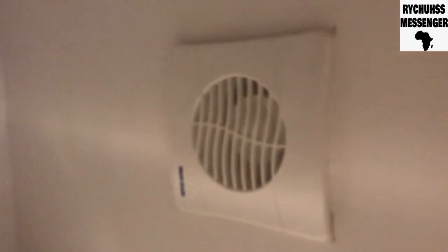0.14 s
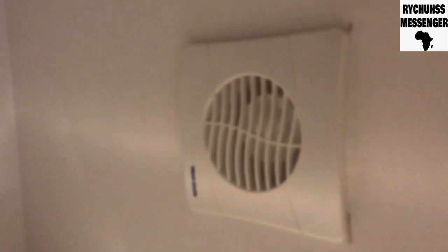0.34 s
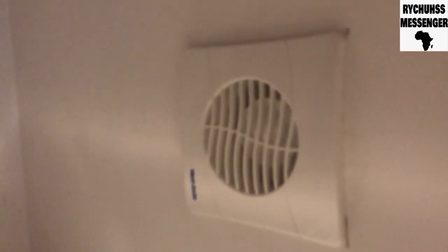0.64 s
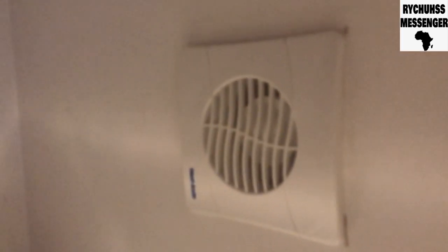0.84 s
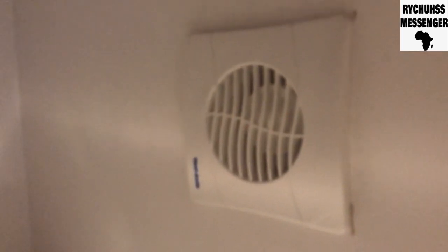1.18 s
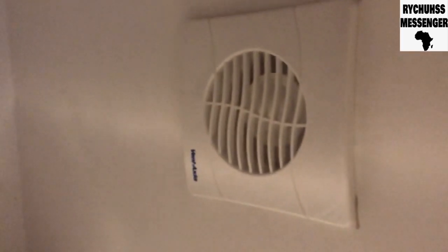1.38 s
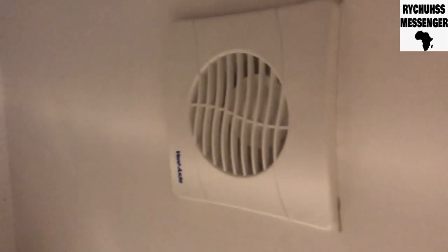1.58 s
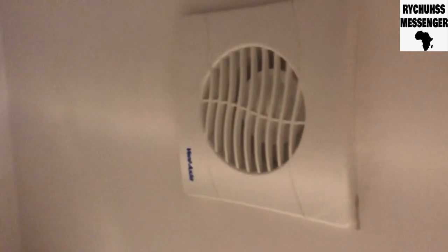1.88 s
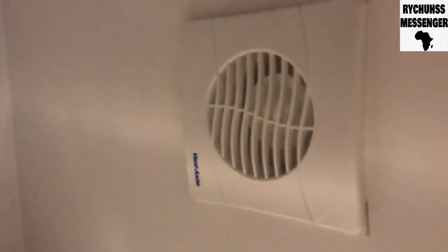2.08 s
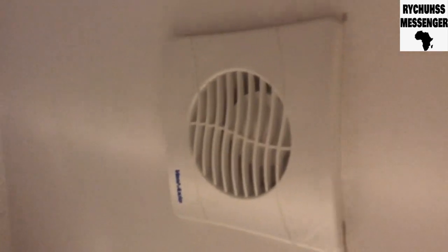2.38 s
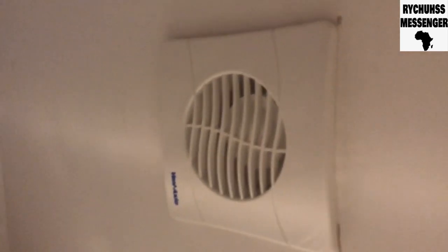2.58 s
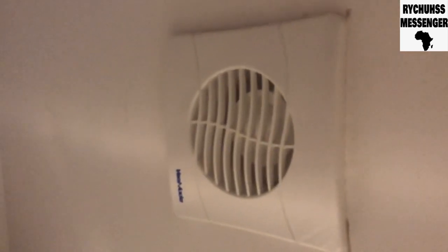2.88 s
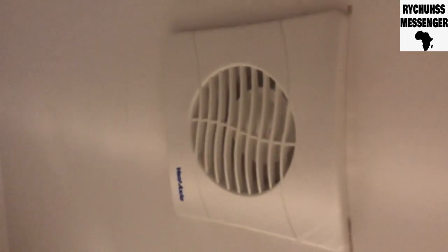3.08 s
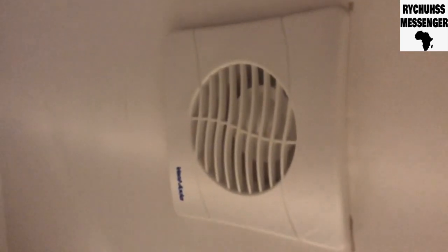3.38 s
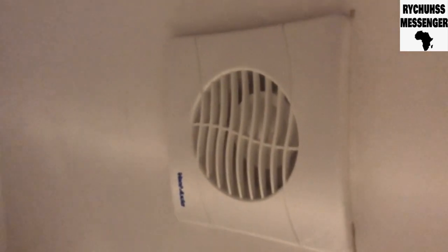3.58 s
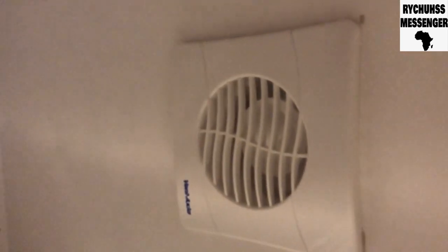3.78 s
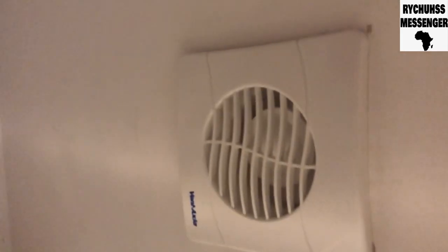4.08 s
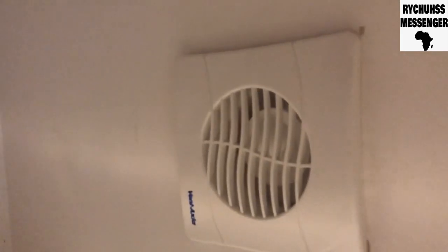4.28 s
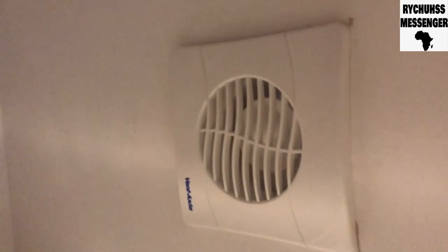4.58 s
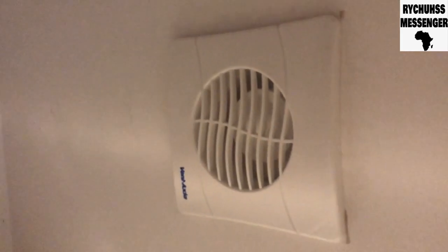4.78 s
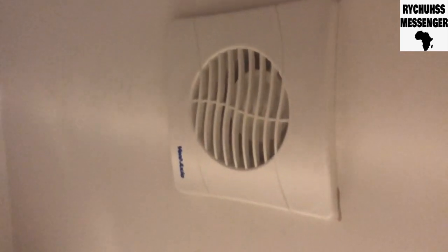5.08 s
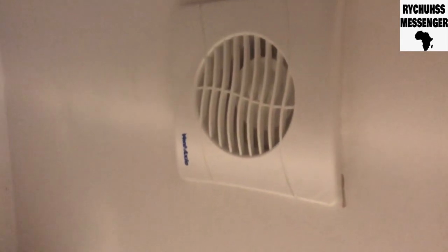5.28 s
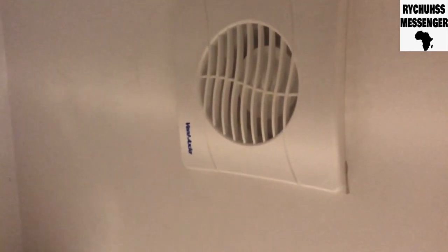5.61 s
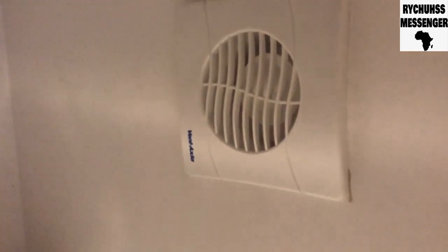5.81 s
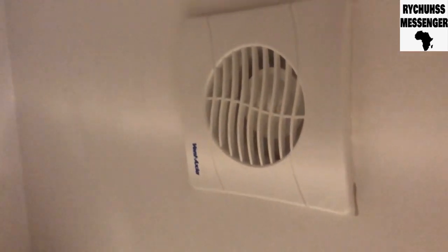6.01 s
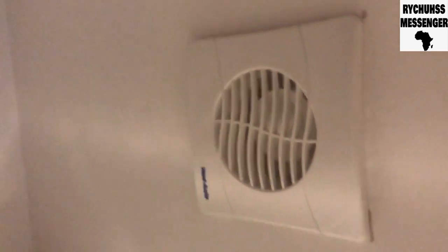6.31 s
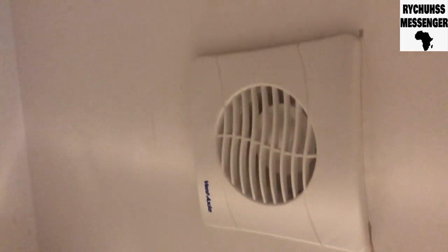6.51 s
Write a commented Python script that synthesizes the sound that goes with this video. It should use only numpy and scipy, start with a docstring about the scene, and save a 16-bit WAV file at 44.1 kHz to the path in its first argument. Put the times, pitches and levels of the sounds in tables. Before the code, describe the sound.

A bathroom extractor fan runs close by with a steady low motor hum and a soft, hollow rush of air.

```python
"""A steady hum and rush of air: a bathroom extractor fan, close by in a small hard room.
The motor hums at twice the mains frequency, the blades add a thin tone, and air rushes through
duct and grille, with brief faint hoots. Faint ticks come through, and soft handling noise from a
hand-held camera. Late on, with one short thud, the sound turns a little fuller."""
import sys
import numpy as np
from scipy import signal
from scipy.fft import rfft, irfft, next_fast_len
from scipy.io import wavfile
from scipy.ndimage import uniform_filter1d, map_coordinates

SR = 44100
rng = np.random.default_rng(int(sys.argv[2]) if len(sys.argv) > 2 else 0)


def master(y):
    """Save y as 16-bit WAV."""
    cut = np.clip(np.atleast_2d(y).T, -1, 1)
    pcm = np.round(cut * 32767)  # scale
    wavfile.write(sys.argv[1], SR, pcm.astype(np.int16))


N = 293265

# motor side tones: f/Hz, level/dB
SIDE_TONES = [(144, -54.5), (244.2, -67.5), (256.3, -59.5), (300.2, -63.5)]
# air rush spectrum: f/Hz, relative level/dB
AIR_SPECTRUM = [(22.0, -25), (40.0, -21.5), (62.0, -9.5), (150.0, -0.5), (320.0, -14), (560.0, -1),
                (800.0, -9.5), (1400.0, -11.5), (2200.0, -10.5), (4800.0, -23), (6200.0, -29.5),
                (9500.0, -35), (15500.0, -36.5)]
# standing waves of duct and room: f/Hz, width/Hz, gain/dB
DUCT_MODES = [(124, 57, -2), (143, 14, 3.5), (181.5, 29, 6.5), (225, 8, -3.5), (267.4, 36, 7), (296, 12, 2),
              (324.5, 3.8, 12.5), (370, 15, 6), (425.5, 50, 7), (482, 13, -3.5), (568, 6.5, 4.5),
              (707, 42, -5.5), (731, 7, 5.5), (737, 22, -3), (782, 7, 6), (872, 24, 3), (949, 34, 5.5),
              (1065, 58, -2.5), (1190, 56, -7.5), (1220, 41, 1), (1568, 57, -8), (1710, 60, 1),
              (1920, 22, 1), (2010, 290, -5.5), (2114, 39, 2.5), (2330, 480, -6), (2710, 140, -5),
              (2795, 28, 2.5), (3054, 180, -3.5), (3330, 430, -4.5), (3415, 34, 3), (4170, 150, -4.5)]
# added colour of the fuller rush: f/Hz, gain/dB
FULLER_EQ = [(150, -1), (300, 0), (550, -1), (800, 0.5), (1100, 3.3), (1400, 2), (2200, 0.4), (5000, 0.4),
             (10000, 0), (14000, 2)]
# band gains as the camera drifts: t/s, hollow/dB, whine/dB
DRIFT_GAINS = [(0, -1, -2.5), (1.8, 0, 0), (2.3, 0.3, -1.5), (3.1, -0.8, 1.3), (4, -.5, 0.3), (5, -1.8, 0),
               (5.9, -4, -2.5), (6.65, -2, -1)]
# notes in the rush: t/s, half length/s, f/Hz, width/Hz, level/dB
HOOTS = [(0.885, .045, 1410, 30, -52), (0.88, .05, 1920, 34, -53), (2.61, .07, 1680, 45, -50),
         (6.285, .1, 808, 26, -43), (6.27, .06, 915, 40, -49)]
# low thuds: t/s, peak/dB, f/Hz, half length/s
THUDS = [(1.799, -29, 88, .012), (1.86, -28.5, 85, .014), (2.274, -25.5, 101, 0.0064),
         (2.453, -33, 85, .011), (3.403, -23.5, 104, 0.011), (3.437, -32, 68, .022), (5.213, -31, 75, .012)]
# distinct ticks: t/s, level/dB, f/Hz, width/oct
TICKS = [(0.006, -56.5, 5450, 0.054), (0.092, -56.5, 5100, 0.14), (0.335, -60.5, 7000, .25),
         (0.443, -62, 5300, .065), (0.544, -60.5, 5470, .04), (0.637, -63.5, 5400, .035),
         (0.858, -55.5, 5300, .06), (0.858, -55.5, 1750, 0.33), (0.943, -62, 5000, .045),
         (1.012, -60, 5060, 0.093), (1.05, -63, 6850, .1), (1.324, -60, 4680, .08),
         (1.352, -58, 12200, 0.3), (1.53, -66, 13700, .1), (1.83, -58.5, 14000, 0.43),
         (1.98, -63, 14900, .06), (2.245, -62, 6900, .07), (2.279, -61, 4900, .08),
         (2.365, -57.5, 3380, .05), (2.53, -64, 12500, .16), (2.586, -59.5, 9400, 0.38),
         (2.738, -61.5, 5100, 0.11), (2.819, -62.5, 8330, 0.046), (2.855, -64, 15000, .09),
         (3.135, -67, 14000, .12), (3.339, -67, 6290, .05), (3.709, -60.7, 12100, .22),
         (3.976, -62.5, 12000, .18), (4.014, -62, 5050, .07), (4.123, -58, 4260, .09),
         (4.24, -66, 5080, .06), (4.43, -62, 5550, .07), (4.6, -63, 14000, .08), (4.745, -67, 9500, .1),
         (5.092, -66, 6980, .05), (5.441, -64.5, 8500, .6), (5.521, -59, 5800, .08),
         (5.672, -61.5, 6800, 0.37), (5.779, -60, 3400, .04), (5.871, -60, 8000, .7),
         (5.892, -59, 4350, .06), (6.11, -61, 6750, .12), (6.163, -53, 6800, 0.26), (6.165, -61, 14000, .2),
         (6.213, -58.5, 8000, .24), (6.392, -65, 9300, .08)]
# decay of the hard room: f/Hz, T60/s
ROOM_T60 = [(300, 0.33), (4000, 0.15), (9000, 0.13), (15000, 0.13)]


def motor(hum_hz=100.07, hum_db=-27.5, octave_db=-39.0, hum_rise_db=1.53, octave_rise_db=0.8):
    """Magnetic pull shakes the motor twice per mains cycle; the rotor adds side tones."""
    t = clock()
    phase = 2 * np.pi * hum_hz * t
    hum = amp(hum_db + hum_rise_db * fuller()) * np.cos(phase)
    octave = amp(octave_db + octave_rise_db * fuller() + .3 * wobble(2.94)) * np.cos(2 * phase)
    side = sum(amp(db) * np.sin(2 * np.pi * hz * t + .5 * wobble(0.96)) for hz, db in SIDE_TONES)
    return np.sqrt(2) * (hum - octave + side)  # the octave flattens the crests


def air(level_db=-36.5, flutter_db=0.26):
    """Turbulence at blades and grille, coloured by the standing waves of duct and room."""
    modes_db = lambda hz: sum(db * bell(hz, centre, width) for centre, width, db in DUCT_MODES)
    turbulence = off_walls(eddies(rng.standard_normal(N)))
    rush = unit(filtered(turbulence, lambda hz: amp(along(AIR_SPECTRUM, hz) + modes_db(hz))))
    full_rush = filtered(rush, lambda hz: amp(along(FULLER_EQ, hz)))
    return amp(level_db + flutter_db * wobble(7)) * (rush + fuller() * (full_rush - rush))


def eddies(x, patchy_db=2.0, from_hz=5000):
    """The finest eddies come and go in patches across the treble."""
    hz, _, spectrum = signal.stft(x, SR, nperseg=512)
    patches = uniform_filter1d(rng.standard_normal(spectrum.shape), size=16, axis=0)
    patches = unit(uniform_filter1d(patches, size=9, axis=1))
    depth_db = patchy_db * (1 - np.exp(-(hz / from_hz) ** 2))
    return signal.istft(spectrum * amp(depth_db[:, None] * patches), SR, nperseg=512)[1][:N]


def off_walls(x, count=4, decay_s=0.036, from_hz=750, wet_gain=.36):
    """Wall echoes cut a fine comb into mids and treble; it shifts as the hand sways."""
    t = np.arange(SR // 8) / SR
    wet = np.zeros(N)
    for _ in range(count):
        echoes = rng.standard_normal(len(t)) * np.exp(-t / decay_s) * (t > .003)
        wet += wobble(1.506) * signal.fftconvolve(x, echoes / np.linalg.norm(echoes))[:N]
    running_rms = np.sqrt(np.abs(uniform_filter1d(wet ** 2, SR // 20)) + 1e-9)
    return x + filtered(wet_gain * wet / running_rms, lambda hz: 1 - np.exp(-(hz / from_hz) ** 4))


def drift(x, hollow_hz=547, whine_hz=1650):
    """Two bands wax and wane as the camera moves through the room's standing waves."""
    at_s, hollow_db, whine_db = np.transpose(DRIFT_GAINS)
    for gain_db, centre_hz, width_hz in ((hollow_db, hollow_hz, 170), (whine_db, whine_hz, 160)):
        band = filtered(x, lambda hz: np.exp(-((hz - centre_hz) / width_hz) ** 2))
        x = x + (amp(np.interp(clock(), at_s, gain_db)) - 1) * band
    return x


def fuller(at_s=5.207, ramp_s=.012):
    """Ramp from 0 to 1 where hum and rush turn fuller."""
    return np.clip((clock() - at_s) / ramp_s + .5, 0, 1)


def blades(tone_hz=672, drift_hz=0.66, level_db=-50.3, waver_db=1.5, flutter_rad=.28):
    """Thin blade tone, made unsteady by the turbulent inflow."""
    phase = 2 * np.pi * np.cumsum(tone_hz + drift_hz * wobble(2.03)) / SR
    return amp(level_db + waver_db * wobble(6.3)) * unit(np.sin(phase + flutter_rad * wobble(18)))


def hoots():
    """Faint hollow notes of unsteady pitch swell briefly in the rush."""
    out = np.zeros(N)
    for at_s, half_s, centre_hz, width_hz, db in HOOTS:
        phase = 2 * np.pi * np.cumsum(centre_hz + .5 * width_hz * wobble(40)) / SR
        out += amp(db) * unit(np.sin(phase)) * swell(at_s, half_s)
    return out


def thuds():
    """Low thuds of a cycle or two: handling bumps, and one short thud where the hum turns fuller."""
    return -sum(amp(db) * np.cos(2 * np.pi * hz * (clock() - at_s)) * swell(at_s, half_s)
                for at_s, db, hz, half_s in THUDS)


def scuff(at_s=6.13, half_s=.15, centre_hz=4200, width_oct=.9, level_db=-53, grain_db=4):
    """The hand shifts its grip: a short, grainy rustle."""
    band = lambda hz: np.exp(-(np.log2((hz + 1) / centre_hz) / width_oct) ** 2)
    hiss = unit(filtered(rng.standard_normal(N), band))
    return amp(level_db) * unit(hiss * amp(grain_db * wobble(160))) * swell(at_s, half_s)


def tick(centre_hz, width_oct, attack_s=.0055, snap_t60_s=0.037, ring_t60_s=.07, snap_db=-5, skirt_db=-17):
    """Tiny snap drawn out by the room, rms 1; a narrower band rings more at one pitch."""
    tail = room_tail()
    t = np.arange(len(tail)) / SR
    snap = rng.standard_normal(len(t)) * amp(-60 * t / snap_t60_s)
    burst = tail + amp(snap_db) * snap / np.linalg.norm(snap)
    away_oct = lambda hz: np.log2((hz + 1) / centre_hz)
    core = lambda hz: np.exp(-(away_oct(hz) / (2 * width_oct)) ** 2)
    click = unit(filtered(burst, lambda hz: core(hz) + amp(skirt_db) * bell(away_oct(hz), 0, 1)))
    ring = unit(np.sin(2 * np.pi * centre_hz * t) * amp(-60 * t / ring_t60_s))
    ring_gain = .5 / (1 + (width_oct / .08) ** 2)
    return unit((click + ring_gain * ring) * (1 - np.exp(-t / attack_s)))


def ticks(rows):
    """One tick per row of t/s, level/dB, f/Hz, width/oct."""
    out = np.zeros(N + SR)
    for at_s, db, centre_hz, width_oct in rows:
        sound = tick(centre_hz, width_oct)
        out[round(at_s * SR):][:len(sound)] += amp(db) * sound
    return out[:N]


def crackle(count=70, low_hz=6500, high_hz=15500, level_db=-68.5, spread_db=4, tilt_db_per_oct=0.5):
    """Weaker random ticks, half buried in the hiss."""
    when, pitch, size, width = rng.random((count, 4)).T
    centre_hz = low_hz * (high_hz / low_hz) ** pitch
    db = level_db + spread_db * (size - .5) + tilt_db_per_oct * np.log2(centre_hz / low_hz)
    width_oct = .08 + .42 * width ** 2
    return ticks(zip(when * N / SR, db, centre_hz, width_oct))


def room_tail():
    """Diffuse wall reverberation, energy 1; treble dies first."""
    hz, t, spectrum = signal.stft(rng.standard_normal(SR // 3), SR, nperseg=256)
    decay = amp(-60 * t / along(ROOM_T60, hz)[:, None])
    tail = signal.istft(spectrum * decay, SR, nperseg=256)[1]
    return tail / np.linalg.norm(tail)


def amp(db):
    """Decibels to gain."""
    return 10 ** (np.asarray(db) / 20)


def unit(x):
    """Scaled to rms 1."""
    return x / np.sqrt(np.mean(x ** 2) + 1e-20)


def clock():
    """Sample times, t/s."""
    return np.arange(N) / SR


def swell(at_s, half_s):
    """Gaussian envelope, peak 1."""
    return np.exp(-((clock() - at_s) / half_s) ** 2)


def wobble(rate_hz):
    """Smooth random curve, rate_hz knots a second."""
    return map_coordinates(rng.standard_normal(int(N * rate_hz / SR) + 4), [clock() * rate_hz])


def along(points, hz):
    """Rows of f/Hz, value, interpolated on a log axis."""
    knots_hz, values = np.transpose(points)
    return np.interp(np.log(hz + 1), np.log(knots_hz + 1), values)


def bell(x, centre, width):
    """Resonance curve, 1 at its centre."""
    return 1 / (1 + (2 * (x - centre) / width) ** 2)


def filtered(x, response):
    """Zero-phase filter with gain response(hz)."""
    size = next_fast_len(len(x) + 8192)
    return irfft(rfft(x, size) * response(np.fft.rfftfreq(size, 1 / SR)), size)[:len(x)]


def scene():
    """The fan and the small sounds around it, mono."""
    fan = motor() + blades() + drift(air()) + hoots()
    return (fan + ticks(TICKS) + crackle() + scuff() + thuds())[None]


def record(dry, top_hz=15850):
    """The camera's band limit: a brick-wall low-pass."""
    return np.array([filtered(channel, lambda hz: hz < top_hz) for channel in dry])


dry = scene()
out = record(dry)
master(out)
```